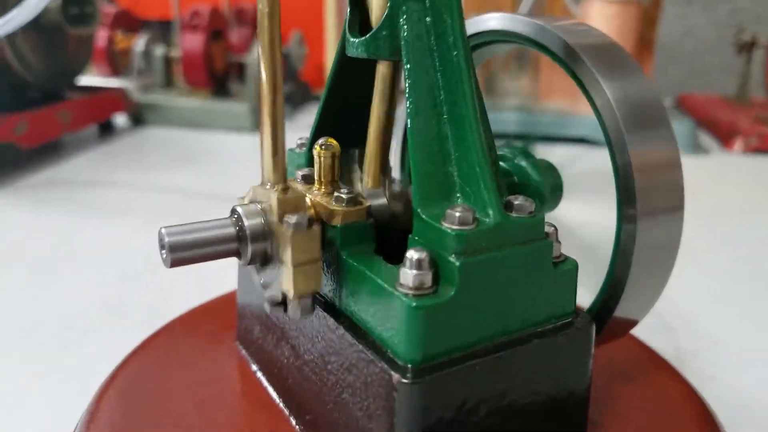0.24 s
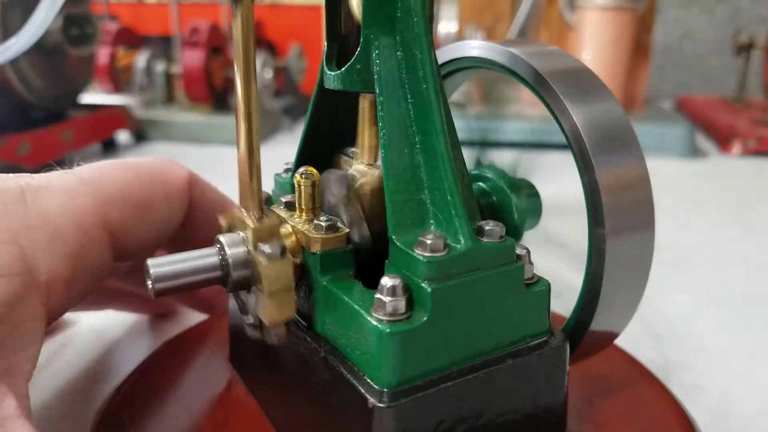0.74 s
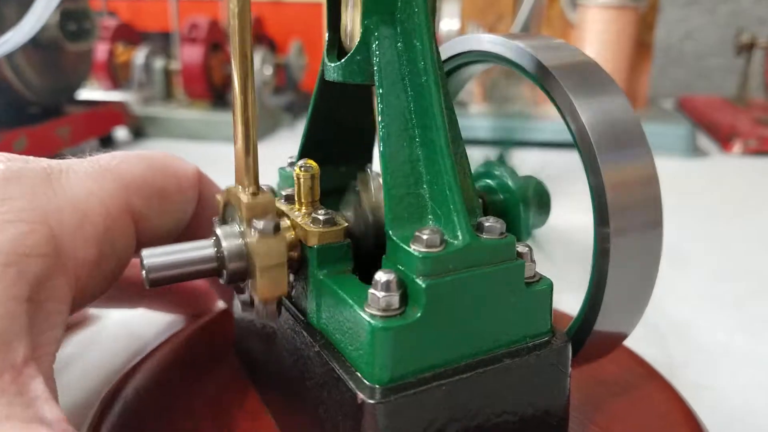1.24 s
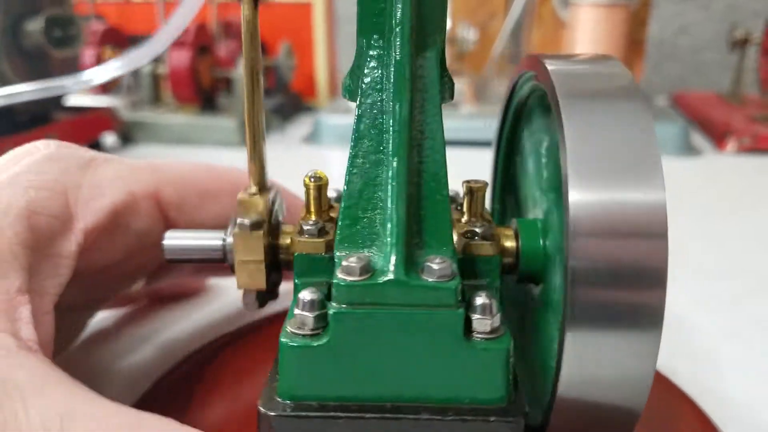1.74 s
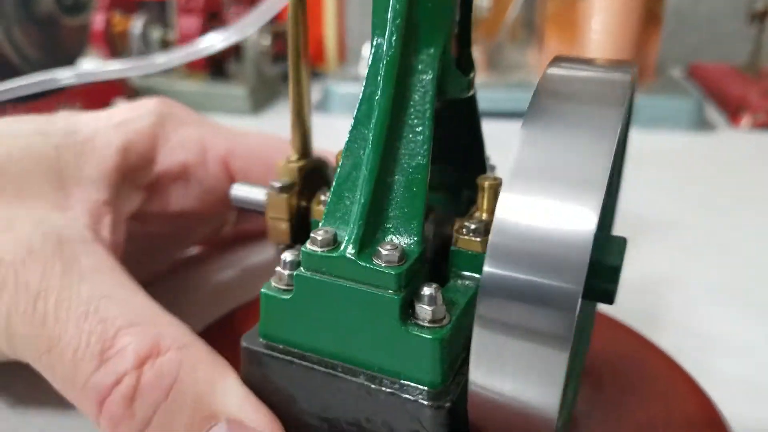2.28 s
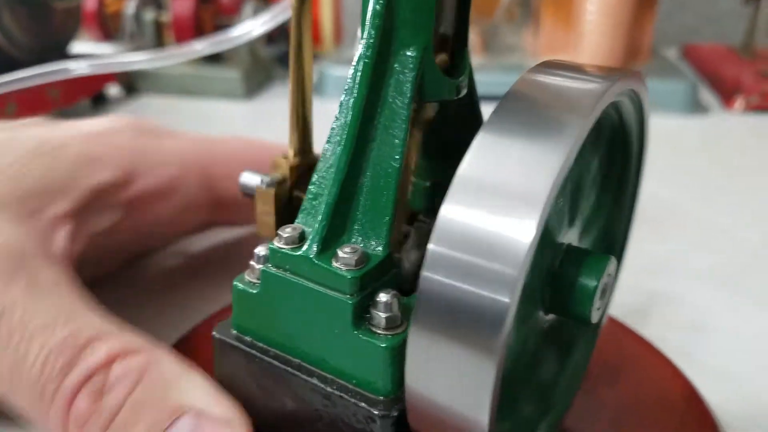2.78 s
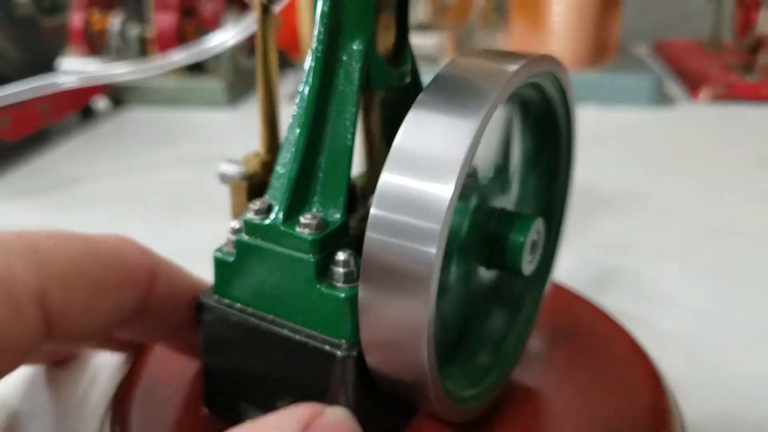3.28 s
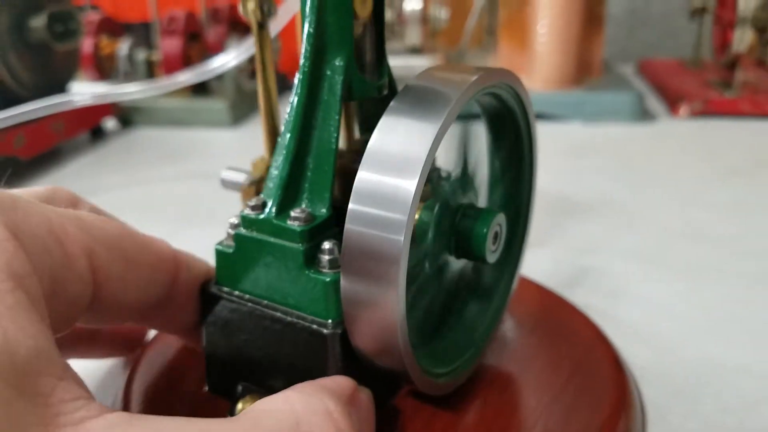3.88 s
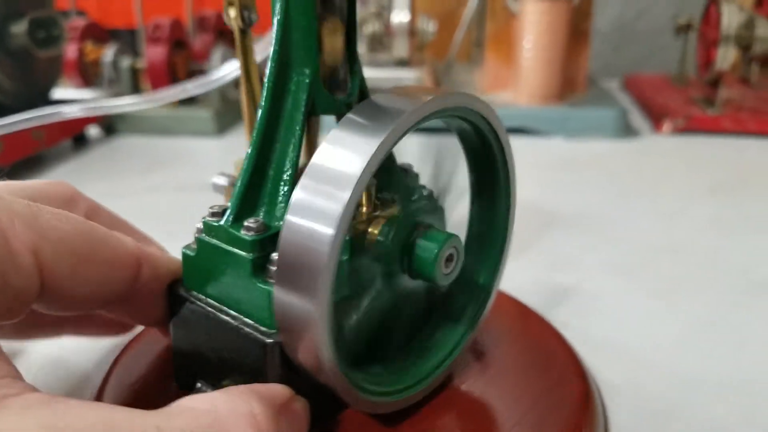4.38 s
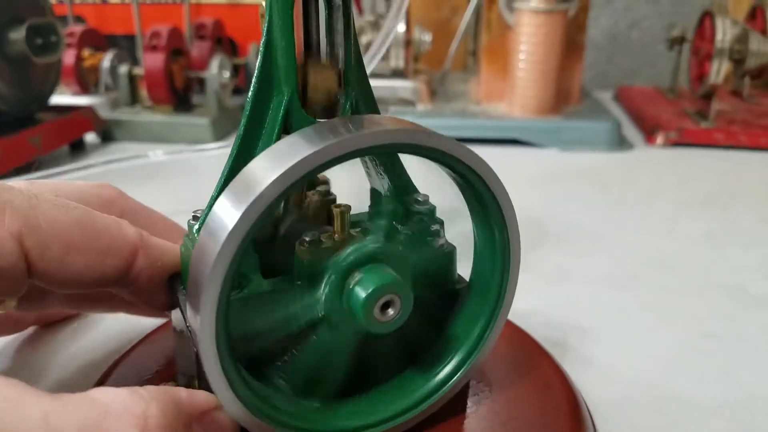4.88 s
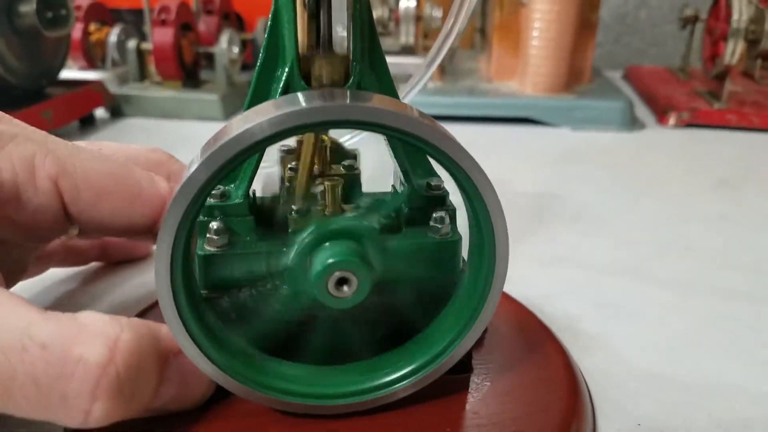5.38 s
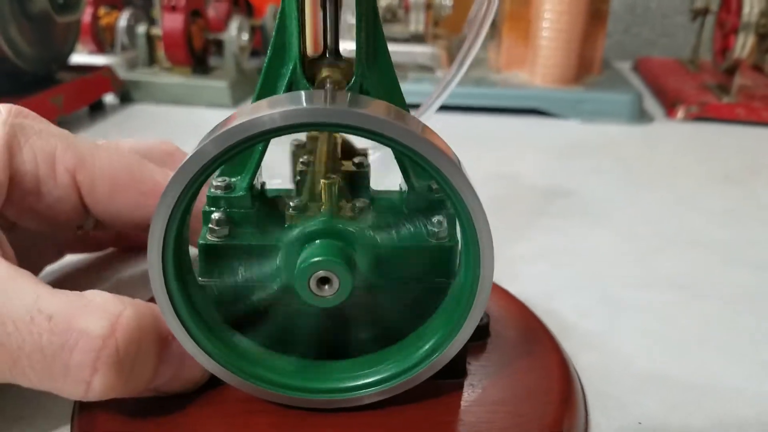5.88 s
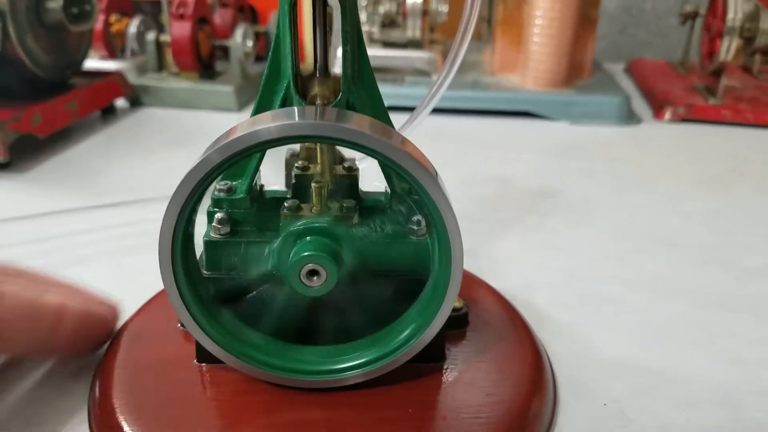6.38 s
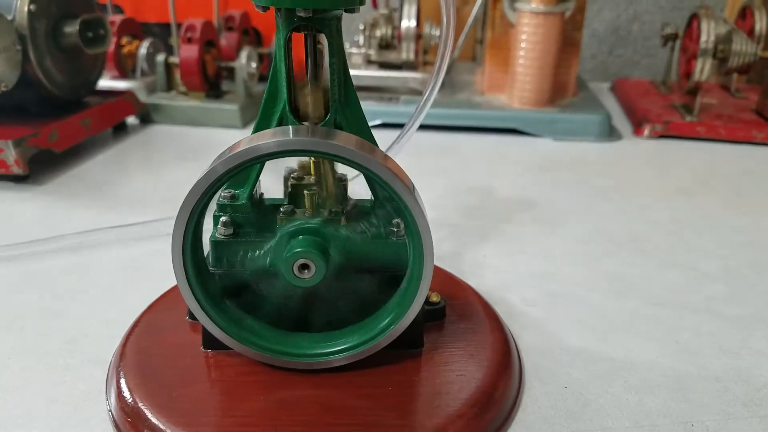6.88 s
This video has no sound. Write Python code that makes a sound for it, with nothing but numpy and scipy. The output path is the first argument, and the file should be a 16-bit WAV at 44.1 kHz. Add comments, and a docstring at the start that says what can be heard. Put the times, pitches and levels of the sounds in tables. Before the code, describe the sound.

From 0 s a small model engine is already running on compressed air, close to a stereo microphone in a quiet workshop. Each turn gives two unequal bright, ringing puffs of hiss, about fifteen a second, blurred into a fast, regular chuffing flutter. Beneath lie soft, dull knocks of the crank in its wooden-based frame, faint room noise and a low hum. In the first second slight low air flutters touch the right side. From about 1.4 s the engine is swung round, with a barely audible rub; around 1.7 to 2 s the exhaust passes the microphone in a short, rough, low thump of wind on the left. The hiss then shifts colour, losing its sharpest edge during a second swing from 4.3 to 6 s and becoming throatier. The pace quickens very slightly until nearly 6 s, then sags; the hiss softens a little as the microphone backs off, still running at 7.1 s.

```python
"""Model steam engine on compressed air

A model steam engine runs at about 460 turns a minute and is turned round on its wooden base.
Each turn lets two unequal puffs of noise out through the ringing exhaust pipe; the crank knocks softly.
The heading colours the hiss. As the pipe swings past, low noise lumps buffet the right port, then the left.
The base rubs on the table as filtered noise while it is turned; room noise and a faint hum lie under it all."""
import sys
import numpy as np
from scipy import signal
from scipy.fft import rfft, irfft
from scipy.io import wavfile
from scipy.ndimage import uniform_filter1d, map_coordinates

SR = 44100
rng = np.random.default_rng(int(sys.argv[2]) if len(sys.argv) > 2 else 0)


def materialize(psi):
    """Save the field psi as 16-bit PCM at rate SR to the path in sys.argv[1].

    A 1-D psi becomes a single channel; in a 2-D psi each row is a channel.
    """
    bounded = np.clip(np.atleast_2d(psi).T, -1, 1)
    quanta = np.round(bounded * 32767).astype(np.int16)
    wavfile.write(sys.argv[1], SR, quanta)


N = 314433
TIME = np.arange(N) / SR  # seconds


def from_db(db):
    """Turn decibels into a gain."""
    return np.exp(np.asarray(db) * (np.log(10) / 20))


def rms_one(x):
    """Scale a sound to an average (rms) strength of 1."""
    return x / np.sqrt(np.mean(x ** 2) + 1e-20)


def in_time(rows):
    """Draw straight lines between the rows, giving each column a value at every sample."""
    seconds, *columns = np.transpose(rows)
    return np.array([np.interp(TIME, seconds, column) for column in columns])


def ease(x):
    """Step smoothly from 0 to 1."""
    return np.sin(np.pi / 2 * np.clip(x, 0, 1)) ** 2


def lobe(heading, centre, width, centre_db, far_db):
    """Level in dB as a bell-shaped lobe or hollow swings past a port."""
    bell = np.exp(-((heading - centre) / width) ** 2)
    return far_db + (centre_db - far_db) * bell


def passes(turns, angle):
    """Find the samples at which the crank passes one angle (in turns)."""
    return np.flatnonzero(np.diff(np.floor(turns - angle)))


def band_noise(low_hz, high_hz, order=2):
    """Noise kept between two edge frequencies, rms 1."""
    sos = signal.butter(order, [low_hz, high_hz], "band", fs=SR, output="sos")
    return rms_one(signal.sosfilt(sos, rng.standard_normal(N)))


def workshop(floor_db=-42.5, hum_db=-53.5, hum_hz=120, apart=0.59):
    """Soft room noise, nearly alike at both ports, and a steady mains hum."""
    # Colour of the room noise. Each row: frequency in Hz, relative level in dB per Hz.
    floor = [(20, 0), (60, -19), (130, 2), (300, -6.5), (600, -7.5), (950, -9.5), (1500, -4), (5000, -5.5),
             (16000, -77)]
    hz, level_db = np.transpose(floor)
    bins = np.maximum(np.fft.rfftfreq(N, 1 / SR), 1)
    colour = from_db(np.interp(np.log(bins), np.log(hz), level_db))
    shared = rng.standard_normal(N)
    white = shared + apart * rng.standard_normal((2, N))
    noise = rms_one(irfft(rfft(white) * colour, N))
    hum = np.sqrt(2) * np.sin(2 * np.pi * hum_hz * TIME)  # rms 1
    return from_db(floor_db) * noise + from_db(hum_db) * hum


def base_rub(heading, level_db=-53, full_degrees_per_s=51, low_hz=450, high_hz=850, right_db=-2):
    """The wooden base slides on the table, louder the faster it is turned; level_db holds at the full speed."""
    degrees_per_s = uniform_filter1d(np.abs(np.gradient(heading)) * SR, SR // 10)
    left = band_noise(low_hz, high_hz)
    right = from_db(right_db) * band_noise(low_hz, high_hz)
    return from_db(level_db) * degrees_per_s / full_degrees_per_s * np.array([left, right])


def eddy_strength(turns, heading, wake_db=-14, wake_length=7.5):
    """Each stroke throws an eddy with a wake, felt at a port when the pipe points at it."""
    # Eddies: two strokes for the right port, then two for the left. Each row: arrival in turns,
    # best heading in degrees, level there in dB, loss in dB per degree off, length in seconds,
    # left minus right in dB.
    eddy_rows = [(0.56, 2.5, -32.5, 1.1, 0.014, -17), (0.093, 5.9, -33.5, 0.5, .014, -17),
                 (0.46, 43.65, -6, 1.44, 0.015, 39), (0.91, 48.9, -13, 1.26, .016, 34)]
    power = np.zeros((2, N))
    around = np.arange(-SR // 2, SR // 2 + 1) / SR
    for angle, best, peak_db, loss_db, length, pan_db in eddy_rows:
        at = passes(turns, angle)
        hits = np.zeros(N)
        hits[at] = from_db(peak_db - loss_db * np.abs(heading[at] - best))
        age = around / length
        wake = ease(age + 1) * np.exp(-2 * np.abs(age) / wake_length)
        shape = np.exp(-2 * age ** 2) + from_db(wake_db) ** 2 * wake
        lumps = np.abs(signal.fftconvolve(hits ** 2, shape, "same"))
        # only the port away from the jet is turned down
        power += from_db(np.minimum([[pan_db], [-pan_db]], 0)) ** 2 * lumps
    return np.sqrt(power)


def port_wind(turns, heading, level_db=0.0, harsh_db=-11):
    """Eddies press on the ports as short lumps of low noise; strong ones break up into higher turbulence."""
    strength = eddy_strength(turns, heading)
    harsh = np.clip(strength / from_db(harsh_db), 0, 1)
    slow = (1 - harsh) ** 4 * band_noise(44, 91)
    middle = 0.63 * band_noise(65.6, 162, order=3)
    rough = 0.72 * harsh * band_noise(157, 362)
    eddies = slow + middle + rough
    # even out the noise so that every eddy has its full strength
    eddies /= np.sqrt(uniform_filter1d(eddies ** 2, int(0.025 * SR), axis=1) + 1e-9)
    return from_db(level_db) * strength * eddies


def ring(force, hz, t60):
    """A unit push sets a sine of height 1 ringing; it falls by 60 dB in t60 seconds."""
    r, w = np.exp(-np.log(1000) / (t60 * SR)), 2 * np.pi * hz / SR
    return signal.lfilter([0, np.sin(w)], [1, -2 * r * np.cos(w), r * r], force + 1e-18)


def crank_knocks(turns, uneven_db=1.5, lowest_hz=70):
    """The load reverses at each dead centre and gives the frame two soft pushes, which make it ring."""
    # Play in the bearings taken up. Each row: crank angle in turns, push level in dB, contact in seconds.
    knocks = [(0.47, -1.5, 0.0049), (0.54, 1, 0.0029), (0.93, -5, 0.0037), (0.0265, 2.5, 0.0012)]
    # Tones of frame and wooden base. Each row: frequency in Hz, level in dB, time to fall 60 dB in seconds.
    base = [(124, -46, 0.097), (202, -39, 0.045), (238, -49, 0.072), (367.5, -45.5, 0.089),
            (433, -44, 0.028)]
    force = np.zeros(N)
    for angle, level_db, contact in knocks:
        at = passes(turns, angle)
        chance_db = uneven_db * rng.standard_normal(size=64)[:len(at)]
        clicks = np.zeros(N)
        clicks[at] = from_db(level_db + chance_db)
        push = signal.windows.hann(int(contact * SR) + 2)
        force += signal.fftconvolve(clicks, push / push.sum())[:N]
    shake = sum(from_db(level_db) * ring(force, hz, t60) for hz, level_db, t60 in base)
    # the small base radiates no deep bass
    return signal.sosfilt(signal.butter(2, lowest_hz, "high", fs=SR, output="sos"), shake)


def air_flow(turns, leak_db=-27, swell_db=1.0, uneven_db=0.82, flutter_db=0.73):
    """The valve opens twice a turn; the flow swells in mid-stroke, where the piston is fastest."""
    # Exhaust valve, one row a stroke. Each row: start of opening in turns, opening time in turns,
    # end of closing in turns, closing time in turns, relative level in dB.
    strokes = [(.035, 0.095, 0.46, 0.096, 0), (0.513, 0.079, 0.95, 0.08, 1.97)]
    flow = from_db(leak_db)
    for opens, rise, closes, fall, level_db in strokes:
        count, angle = np.divmod(turns - opens + 1, 1)
        span = closes - opens
        valve = ease(angle / rise) * ease((span - angle) / fall)
        swell = swell_db * (np.sin(np.pi * np.clip(angle / span, 0, 1)) - 1)
        chance = uneven_db * rng.standard_normal(size=64)[count.astype(int)]
        flow = flow + valve * from_db(level_db + swell + chance)
    return rms_one(flow * from_db(flutter_db * band_noise(45, 680)))


def resonant_noise(hz, width_hz):
    """Turbulence passed twice through one resonance, rms 1."""
    r = np.exp(-np.pi * width_hz / SR)
    section = [1, 0, -1, 1, -2 * r * np.cos(2 * np.pi * hz / SR), r * r]
    return rms_one(signal.sosfilt([section, section], rng.standard_normal(N)))


def pipe_tone(flow, hz, width_hz, left_db, right_db, lag, steepening=0.061):
    """The puffs blow one resonance, heard at both ports; a faster jet is brighter."""
    noise = resonant_noise(hz, width_hz)
    # higher tones follow the flow more steeply
    puffs = rms_one(flow ** (1 + steepening * np.log10(hz / 5000)))
    ports = np.array([noise, np.roll(noise, round(lag * SR))])
    return puffs * ports * from_db([[left_db], [right_db]])


def glance(x, heading, delay_s=.000255, delay_s_per_degree=.000001, right_db=-13, mirror_hz=8500):
    """The small frame mirrors only the finest hiss; the path lengthens with heading and sweeps notches."""
    # Two mirroring faces of the frame. Each row: centre heading in degrees, half width in degrees,
    # echo level at the centre in dB, echo level far from it in dB (the right port adds right_db).
    mirrors = [(58, 16, -10.5, -14), (130, 18, -7, -15)]
    delay = delay_s + delay_s_per_degree * heading
    fine = signal.sosfiltfilt(signal.butter(3, mirror_hz, "high", fs=SR, output="sos"), x)
    echo = np.array([map_coordinates(port, [(TIME - delay) * SR], order=3) for port in fine])
    echo_db = np.max([lobe(heading, *face) for face in mirrors], axis=0)
    return x + echo * from_db(echo_db + [[0], [right_db]])


def reflections(x, t60, delay):
    """Dense dying echoes of about unit energy, different at each port, starting after a delay in seconds."""
    age = TIME[:SR // 2] - delay
    fade = (age > 0) * np.exp(-np.log(1000) * np.abs(age) / t60)
    tail = rng.standard_normal((2, len(age))) * fade
    tail /= np.sqrt(np.sum(tail ** 2, axis=1, keepdims=True))
    return signal.oaconvolve(x, tail[:, age < t60], axes=1)[:, :N]


def shifting_reflections(x, t60, delay, count=7):
    """As engine and microphone move, one pattern of near echoes gives way to the next."""
    place = np.linspace(0, count - 1, N)
    return sum(np.sqrt(ease(1 - np.abs(place - k))) * reflections(x, t60, delay) for k in range(count))


def exhaust(turns, heading, direct_db=-0.03, near_db=-5.5, room_db=-12.0, room_beaming=0.81):
    """Puffs sound the pipe; its high tones are beamed at the ports, while the room hears them more evenly."""
    # Low resonances of the pipe, alike from every side. Each row: frequency in Hz, width in Hz,
    # left level in dB, right level in dB, right port's lag in seconds.
    bore = [(627, 390, -51.5, -54, 0.00018), (1206, 270, -51.5, -53, 0.00025),
            (1639, 366, -36.5, -45, 0.00015), (1860, 500, -42, -42.5, 0.00007)]
    # The pipe's throaty middle tones, before the heading acts. Each row: frequency in Hz, width in Hz,
    # left level in dB, right level in dB.
    honk_tones = [(2966, 496, -31.5, -24.5), (2110, 1200, -51, -36.5)]
    # High resonances of pipe and jet, before the heading acts. Each row: frequency in Hz, width in Hz,
    # left level in dB, right level in dB, right port's lag in seconds, beaming from 0 to 1.
    pipe = [(3520, 1430, -34.5, -48, 0.00017, 0.1), (4445, 660, -29, -33.5, .00011, 0.52),
            (4920, 940, -45.5, -35, .00012, 0), (5560, 2500, -41, -63, 0.00013, 1),
            (6456, 1230, -38.5, -33.5, .00016, 1), (7980, 3900, -41, -37, 0.00019, 0.35),
            (10520, 1700, -39.5, -49, .00018, 0.1), (12315, 1370, -25.5, -26, .00018, 1),
            (13380, 2600, -27, -31.5, .00018, 0.6), (15000, 1400, -35.5, -41.5, 0.00021, 0.2)]
    # The pipe's overall lobe, a single row: centre heading in degrees, half width in degrees,
    # level at the centre in dB, level far from it in dB.
    pipe_lobe = (52.5, 69, 5, -1.9)
    # Lobes and hollows with the same columns, first row left port, second row right port.
    beam_lobes = [(16.5, 97, 1.7, -8.5), (0.5, 74, 3.8, -13)]  # fully beamed high tones
    honk_side_on = [(61.7, 16.7, 5.5, 0), (71, 23, -8, -3)]  # middle tones, pipe side-on
    honk_face_on = [(140, 26, -7, 0), (138.5, 30, 4, 0.004)]  # middle tones, face-on

    flow = air_flow(turns)
    pipe_db = lobe(heading, *pipe_lobe)
    beam_db = np.array([lobe(heading, *port) for port in beam_lobes])
    honk_db = np.array([lobe(heading, *side) + lobe(heading, *face)
                        for side, face in zip(honk_side_on, honk_face_on)])
    honk = sum(pipe_tone(flow, *mode, lag=.00018) for mode in honk_tones)
    low = sum(pipe_tone(flow, *mode) for mode in bore) + honk * from_db(honk_db)
    high, spread = 0, low
    for *mode, beaming in pipe:
        tone = pipe_tone(flow, *mode)
        turned_db = beaming * (beam_db - pipe_db)
        high = high + tone * from_db(pipe_db + turned_db)
        spread = spread + tone * from_db(room_beaming * turned_db.mean(axis=0))
    direct = low + glance(high, heading)
    bench = shifting_reflections(direct, t60=0.029, delay=0.00095)
    room = reflections(spread, t60=0.22, delay=.008)
    return from_db(direct_db) * direct + from_db(near_db) * bench + from_db(room_db) * room


def scene():
    """The crank times puffs, knocks and eddies; the heading decides how puffs and eddies reach the ports."""
    # The engine gathers a little speed, then sags. Each row: time in seconds, turns per second.
    speed_curve = [(0, 7.4865), (2.2, 7.6631), (5.8, 7.8244), (7.13, 7.5857)]
    # The hand swings the engine round in two pushes. Each row: time in seconds, heading in degrees.
    heading_curve = [(0, 2), (1.35, 12), (1.75, 41.5), (2.5, 69), (4.25, 87.5), (5, 112.5), (6.15, 144),
                     (7.13, 146)]
    # The microphone backs away near the end. Each row: time in seconds, exhaust gain in dB.
    nearness_curve = [(0, -0.5), (5.9, 0.5), (6.6, -0.5), (7.13, -1.6)]
    speed, = in_time(speed_curve)
    heading, = in_time(heading_curve)
    near_db, = in_time(nearness_curve)
    turns = .2086 + np.cumsum(speed) / SR  # starts part-way through a turn
    background = workshop() + base_rub(heading)
    engine = crank_knocks(turns) + from_db(near_db) * exhaust(turns, heading)
    return background + port_wind(turns, heading) + engine


def record(dry):
    """A steep low-pass filter cuts the treble above 15850 Hz."""
    return signal.sosfilt(signal.ellip(12, .1, 90, 15850, fs=SR, output="sos"), dry)


dry = scene()
out = record(dry)
materialize(out)
```